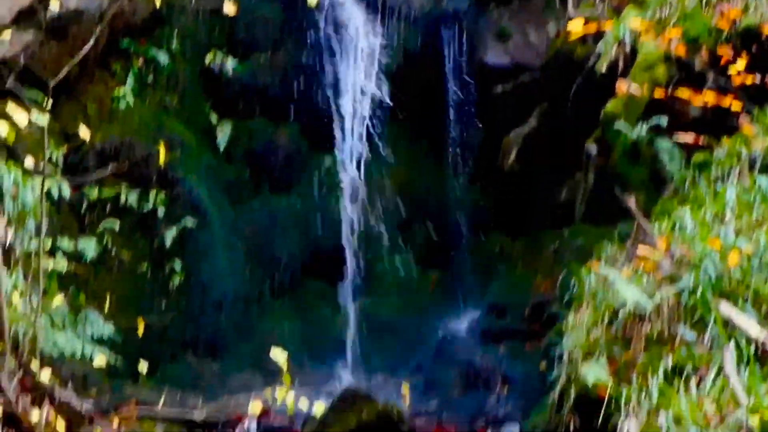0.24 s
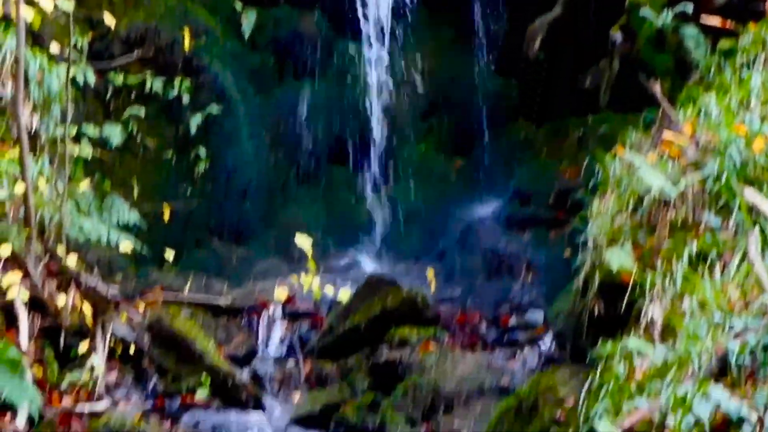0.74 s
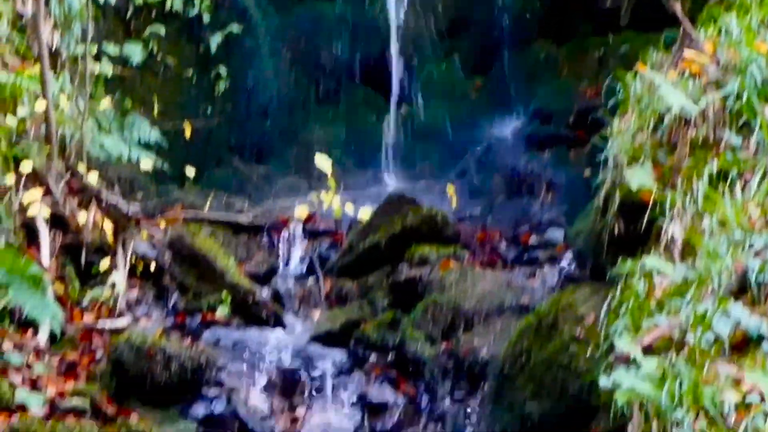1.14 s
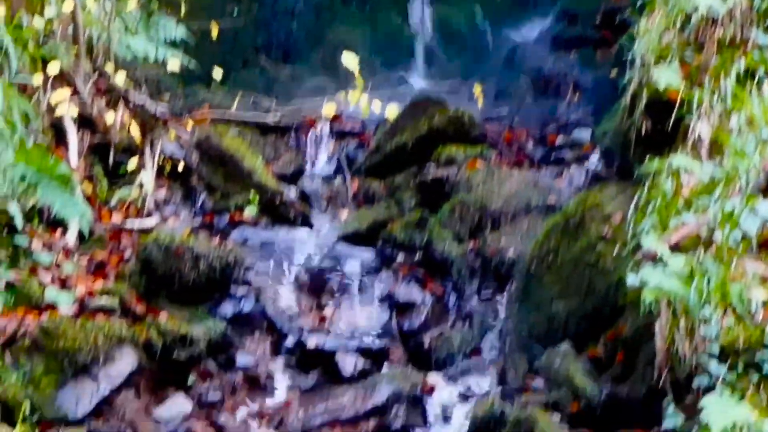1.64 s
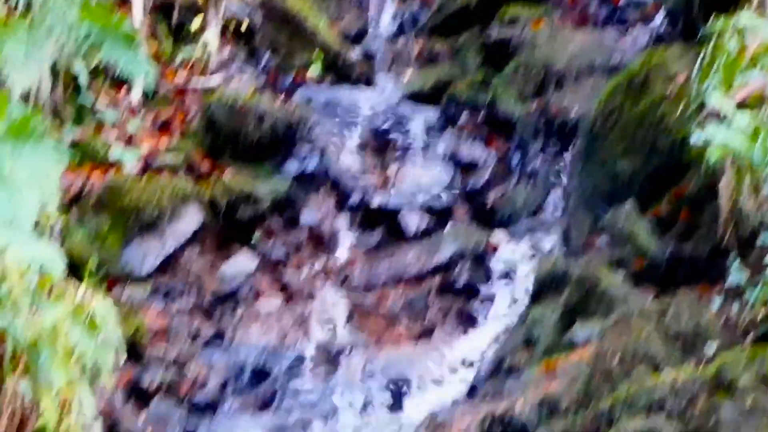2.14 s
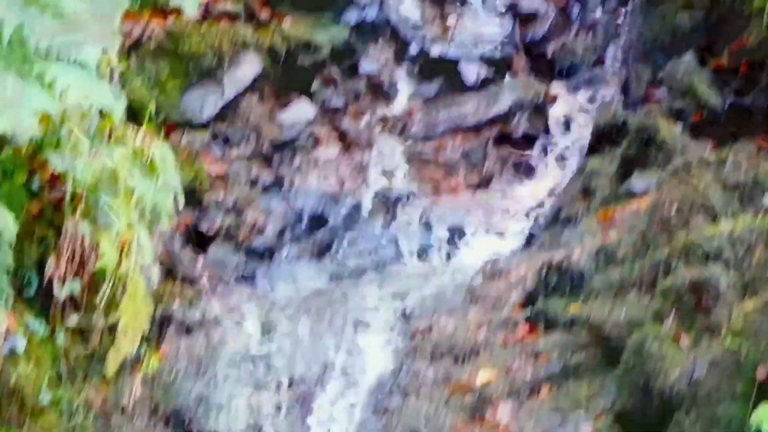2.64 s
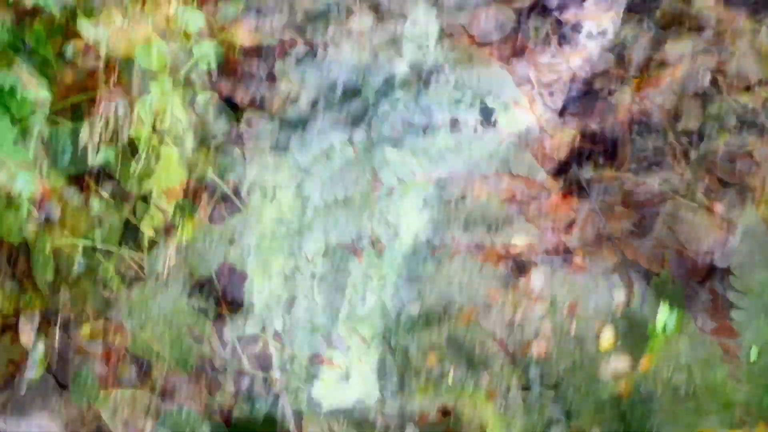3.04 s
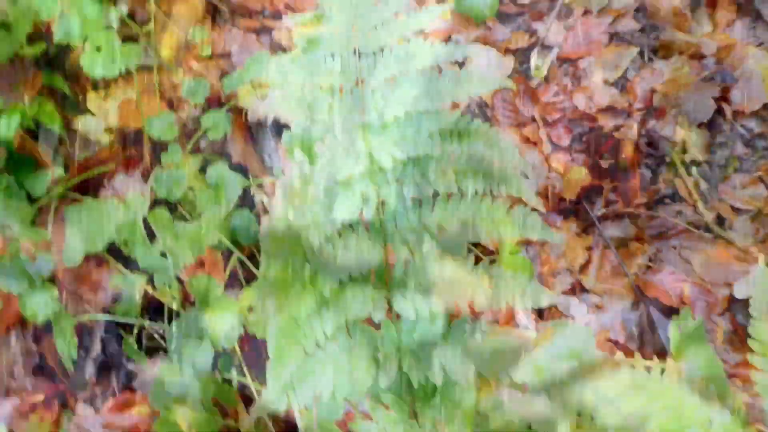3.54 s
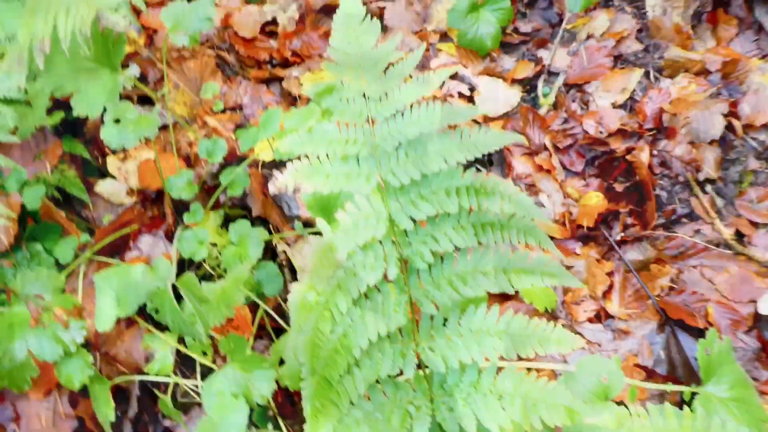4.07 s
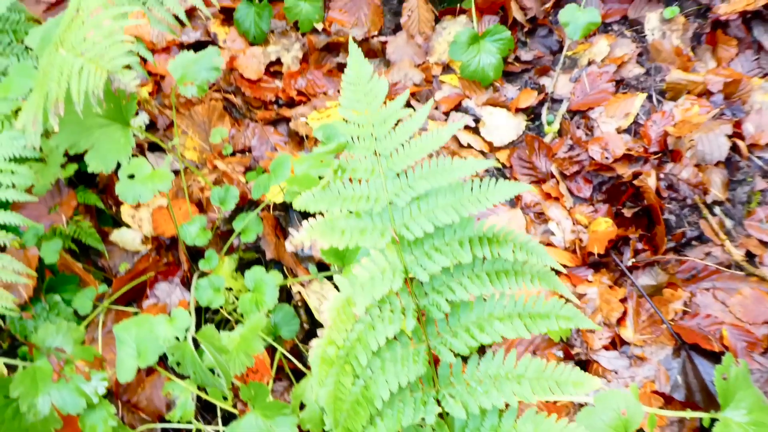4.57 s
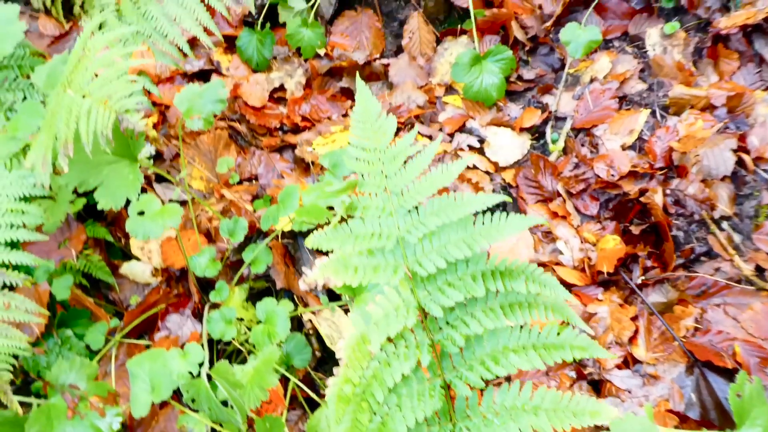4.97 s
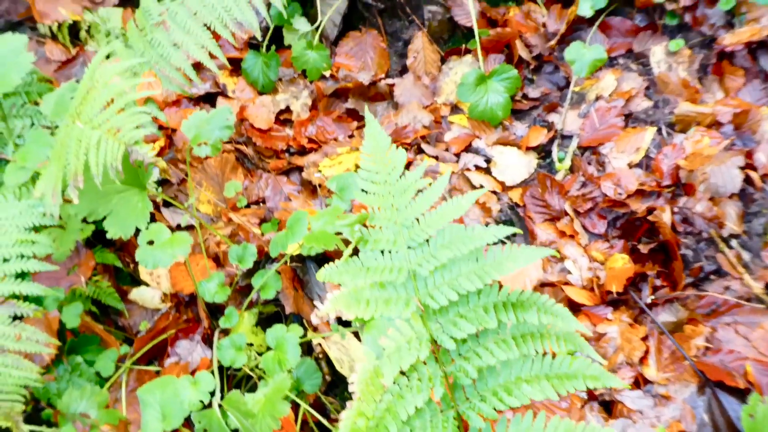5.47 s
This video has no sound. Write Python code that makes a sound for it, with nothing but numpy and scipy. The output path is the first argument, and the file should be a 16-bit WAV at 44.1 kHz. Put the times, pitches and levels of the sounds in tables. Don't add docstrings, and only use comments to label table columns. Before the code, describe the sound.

Bright splashing water with bubbling plops and hissing spray gives way to a quieter, wider stream rush, ending with a faint double tap.

```python
import sys
import numpy as np
from scipy import signal
from scipy.fft import rfft, irfft, next_fast_len
from scipy.io import wavfile
from scipy.ndimage import uniform_filter1d, map_coordinates

SR = 44100
rng = np.random.default_rng(int(sys.argv[2]) if len(sys.argv) > 2 else 0)


def volts_from_decibels(level):
    exponent = np.asarray(level, float) / 20
    return 10 ** exponent


def digitize_waveform(pressure):
    field = np.atleast_2d(pressure).T
    bounded = np.clip(field, -1, 1)
    quanta = np.round(bounded * 32767).astype(np.int16)
    wavfile.write(sys.argv[1], SR, quanta)


N = 251811
TIME_S = np.arange(N) / SR
FALL_DB = -25.5


def unit(x):
    return x / np.sqrt(np.mean(x ** 2) + 1e-20)


def along(points, hz):
    f, v = np.transpose(points)
    return np.interp(np.log(hz + 1), np.log(f + 1), v)


def wobble(knots_per_s):
    return map_coordinates(rng.standard_normal(400), [TIME_S * knots_per_s])


def filtered(x, response):
    m = next_fast_len(N + 8192)
    return irfft(rfft(x, m) * response(np.fft.rfftfreq(m, 1 / SR)), m)[..., :N]


def patchy(depth_db, size):
    z = signal.stft(rng.standard_normal((2, N)), nperseg=256)[2]
    field = rng.standard_normal(z.shape[1:])
    field = uniform_filter1d(field, size[0], 0)
    field = uniform_filter1d(field, size[1], 1)
    noise = signal.istft(z * volts_from_decibels(depth_db * unit(field)), nperseg=256)[1]
    return unit(noise[:, :N])


def bubbles(count, centre_hz, octaves, cycles, spread_db, rise):
    length = 320
    when, pitch, size, side = rng.random((count, 4)).T
    hz = np.minimum(centre_hz * 2 ** (octaves * (2 * pitch - 1)), SR / 3)[:, None]
    turns = hz * np.arange(length) / SR
    life = turns / cycles
    envelope = np.exp(-3 * life) * (1 - np.exp(-12 * life))
    shape = np.sin(2 * np.pi * turns * (1 + rise * life / 2)) * envelope
    shape *= np.sqrt(hz / centre_hz * np.linspace(1, 0, length))
    shape *= volts_from_decibels(-spread_db * np.log(size + 0.0074))[:, None]
    start = (when * N).astype(int)[:, None]
    cloud = (side > 0.5)[:, None] * (N + length)
    at = start + np.arange(length) + cloud
    total = np.bincount(at.ravel(), shape.ravel(), 2 * (N + length))
    return unit(total.reshape(2, -1)[:, :N])


def placed(pair, spectrum, alike, lean):
    def coloured(hz):
        turn = np.arccos(np.clip(along(alike, hz), -1, 1)) / 2
        return volts_from_decibels(along(spectrum, hz)) * [np.cos(turn), np.sin(turn)]

    mid, side = filtered(pair, coloured)
    both = np.array([mid + side, mid - side])
    both = filtered(both, lambda hz: volts_from_decibels(along(lean, hz) * [[0.5], [-0.5]]))
    return both / np.sqrt(np.mean(both.mean(0) ** 2))


def single_bubble(start_s, hz, level_db, life_s):
    u = np.clip((TIME_S - start_s) / life_s, 0, 9)
    swell = np.e * 2 * u * np.exp(-2 * u)
    return volts_from_decibels(level_db) * swell * np.sin(2 * np.pi * hz * life_s * u * (1 + 0.016 * u))


def turned():
    start_s, takes_s = 2.45, 1.916
    return np.clip((TIME_S - start_s) / takes_s, 0, 1)


# (frequency [Hz], density [dB per Hz])
STREAM_SPECTRUM = [(18, -76), (64, -23), (170, -14), (260, -6), (600, -1.5), (1050, -6.5), (1550, -3),
                   (2200, -6.5), (3500, -6.5), (4700, -10), (7800, -22.5), (9800, -27), (11500, -37),
                   (15200, -45)]
# (frequency [Hz], left-right likeness [0-1])
STREAM_ALIKE = [(60, 0.17), (110, 0.2), (250, 0.45), (480, 0.21), (740, 0.47), (1300, 0.8), (2400, 0.79),
                (3300, 0.94), (4200, .99), (5300, 0.95), (6800, 0.72), (9000, 0.41), (15000, .3)]
# (frequency [Hz], left minus right [dB])
STREAM_LEAN = [(60, -2.5), (450, -0.5), (1200, -5), (2000, -2.5), (3300, -0.5), (4200, -1), (15000, 0)]


def stream():
    drops = bubbles(count=6000, centre_hz=1300, octaves=1.14, cycles=8.1, spread_db=3.5, rise=0.19)
    foam = patchy(0.57, size=(4, 14)) + volts_from_decibels(-17.5) * drops
    level_db = -43.5 + 0.24 * wobble(11)
    return turned() * volts_from_decibels(level_db) * placed(foam, STREAM_SPECTRUM, STREAM_ALIKE, STREAM_LEAN)


# (time [s], frequency [Hz], level [dB])
GURGLE_EVENTS = [
    (4.665, 592, -51),
    (4.95, 1750, -53),
    (5.065, 1565, -50),
    (5.205, 1490, -46),
    (5.275, 652, -54),
    (5.48, 1800, -47),
]


def gurgles():
    out = sum(single_bubble(*event, life_s=0.028) for event in GURGLE_EVENTS)
    return out * volts_from_decibels([[-1.5], [1.5]])


# (time [s], frequency [Hz], level [dB], t60 [s], right port delay [s])
KNOCK_EVENTS = [
    (5.549, 320, -35, .028, .0014),
    (5.5565, 255, -38, .04, .0005),
]


def knock():
    attack_s, low_cut_hz = 0.00079, 190
    out = np.zeros((2, N))
    for start_s, hz, level_db, t60_s, lag_s in KNOCK_EVENTS:
        t = np.maximum(TIME_S - start_s - np.array([[0], [lag_s]]), 0)
        envelope = volts_from_decibels(level_db - 60 * t / t60_s) * (1 - np.exp(-t / attack_s))
        out += envelope * np.sin(2 * np.pi * hz * t)
    return filtered(out, lambda hz: 1 / (1 + (low_cut_hz / (hz + 1)) ** 4))


# (frequency [Hz], density [dB per Hz])
STRAY_SPECTRUM = [(2600, -60), (3300, 7), (5000, -5), (7300, -15), (8200, -60)]


def strays():
    swing_db, under_fall_db = 9, -27
    bursts = patchy(swing_db, size=(6, 12))[0]
    bursts = filtered(bursts, lambda hz: volts_from_decibels(along(STRAY_SPECTRUM, hz)))
    return (1 - turned()) * volts_from_decibels(FALL_DB + under_fall_db) * unit(bursts) * np.array([[1], [-1]])


# (time [s], frequency [Hz], level [dB])
PLOP_EVENTS = [(.342, 970, -22), (.67, 4200, -29), (.757, 696, -28.5), (1.009, 806, -24.5),
               (1.691, 866, -26), (1.866, 2850, -27), (2.035, 630, -31), (2.076, 4100, -29),
               (2.285, 790, -29), (2.369, 1770, -25), (2.422, 3240, -26), (2.545, 2670, -25),
               (2.812, 519, -28.5), (3.184, 740, -39), (3.31, 800, -33), (3.38, 2710, -28),
               (3.463, 685, -32.5)]


def plops():
    out = np.zeros(N)
    for start_s, hz, level_db in PLOP_EVENTS:
        life_s = 0.01 * (1000 / hz) ** 0.58
        out += single_bubble(start_s, hz, level_db, life_s)
    return out * volts_from_decibels([[-1.5], [1.5]])


# (frequency [Hz], density [dB per Hz])
RUSH_SPECTRUM = [(18, -80), (45, -50), (75, -26.5), (150, -18.5), (200, -9.5), (400, -5.5), (560, -4),
                 (1000, -5), (1500, -5), (2300, -5), (2900, -5), (3500, -8), (6000, -13.5), (8300, -20.5),
                 (11000, -34)]
# (frequency [Hz], density [dB per Hz])
SPRAY_SPECTRUM = [(5000, -21), (7500, -18.5), (8600, -1.5), (10000, 0.5), (11500, -5), (13000, -10.5),
                  (14500, -23), (15200, -22)]
# (frequency [Hz], width [Hz], lift [dB])
HOLLOW = (780, 42, 1.9)
# (frequency [Hz], left-right likeness [0-1])
FALL_ALIKE = [(60, 0.33), (110, 0.59), (200, 0.87), (380, 0.77), (700, 0.92), (1300, 0.91), (2400, 0.95),
              (3100, 0.96), (3500, 1), (7300, 1), (7900, 0.8), (10000, 0.67), (15000, 0.25)]
# (frequency [Hz], left minus right [dB])
FALL_LEAN = [(60, -4), (300, -4), (1200, -2), (2200, -3), (3000, -2), (3500, -0.5), (7300, -0.5),
             (9000, -1.5), (15000, 1.5)]


def rush(slap):
    drops = bubbles(count=9000, centre_hz=1725, octaves=1.578, cycles=9.6, spread_db=2.0, rise=0.27)
    foam = patchy(0.84, size=(8, 6)) + volts_from_decibels(-12) * drops
    centre_hz, width_hz, lift_db = HOLLOW
    foam = filtered(foam, lambda hz: volts_from_decibels(lift_db / (1 + ((hz - centre_hz) / width_hz) ** 2)))
    level_db = FALL_DB + 0.29 * slap + 0.2 * wobble(34.96)
    return volts_from_decibels(level_db) * placed(foam, RUSH_SPECTRUM, FALL_ALIKE, FALL_LEAN)


def spray(slap):
    drops = bubbles(count=9000, centre_hz=10000, octaves=0.36, cycles=3, spread_db=0.0, rise=0.1)
    mist = patchy(1.3, size=(20, 5)) + volts_from_decibels(-7.5) * drops
    level_db = FALL_DB - 18 + 0.14 * slap + 0.42 * wobble(9.7)
    return volts_from_decibels(level_db) * placed(mist, SPRAY_SPECTRUM, FALL_ALIKE, FALL_LEAN)


def fall():
    slap = wobble(14)
    return (1 - turned()) * (rush(slap) + spray(slap))


def scene():
    return stream() + gurgles() + knock() + strays() + plops() + fall()


def roll_off(x):
    return signal.sosfilt(signal.butter(12, 15200, fs=SR, output="sos"), x)


def record(dry):
    return roll_off(dry)


dry = scene()
out = record(dry)
digitize_waveform(out)
```